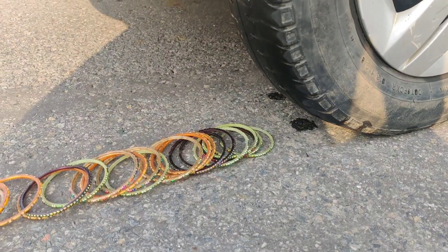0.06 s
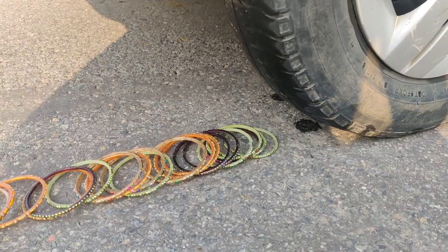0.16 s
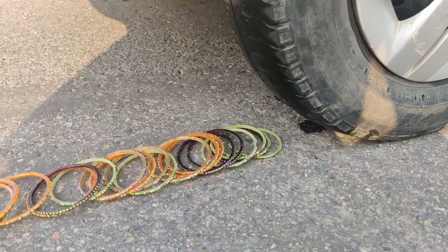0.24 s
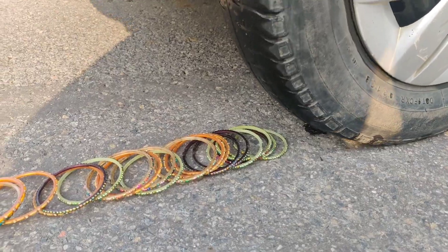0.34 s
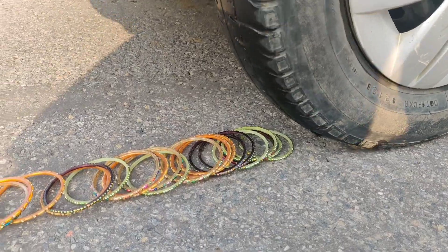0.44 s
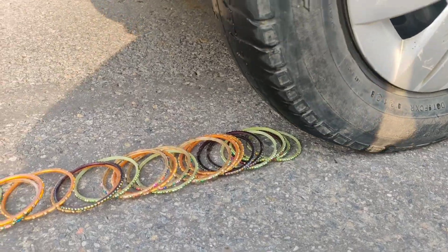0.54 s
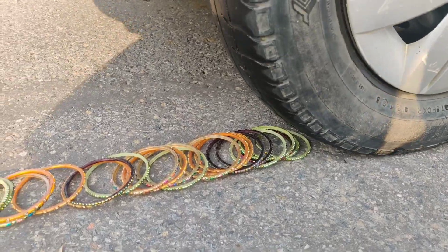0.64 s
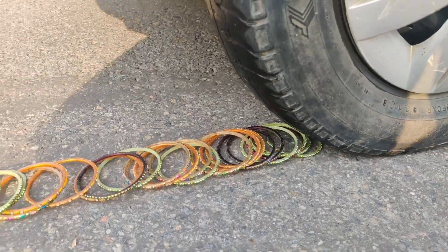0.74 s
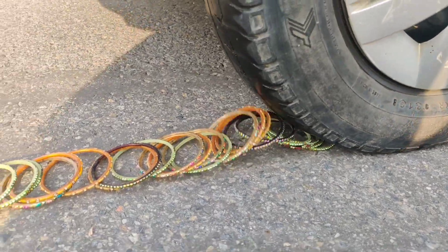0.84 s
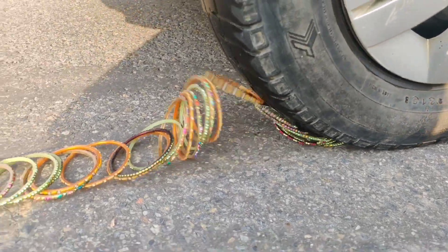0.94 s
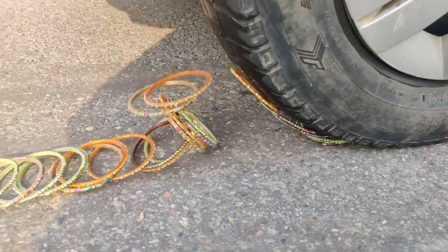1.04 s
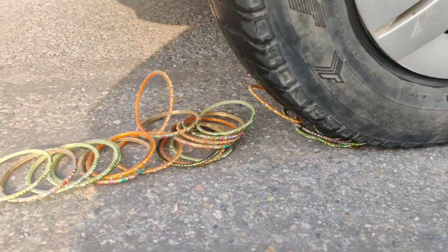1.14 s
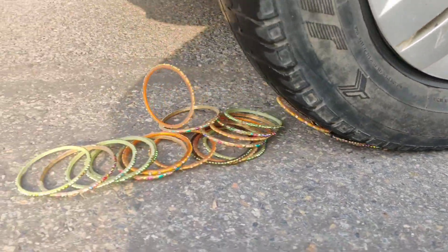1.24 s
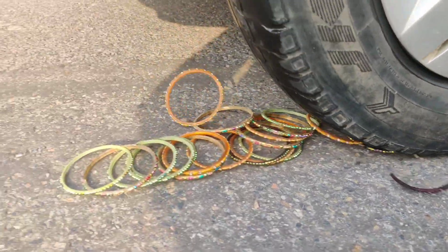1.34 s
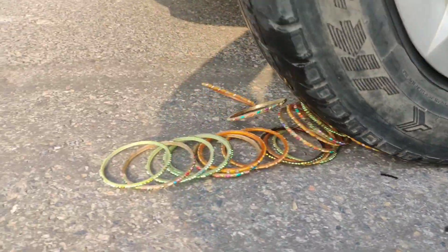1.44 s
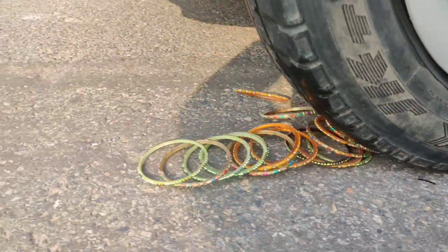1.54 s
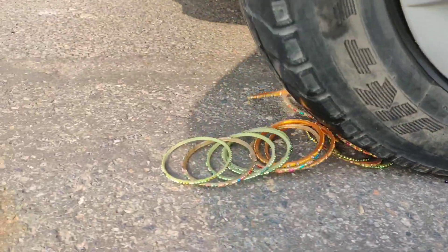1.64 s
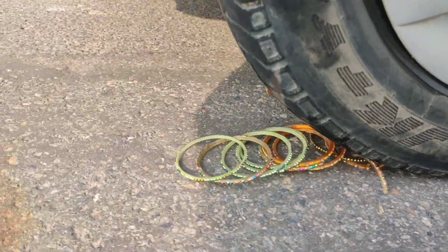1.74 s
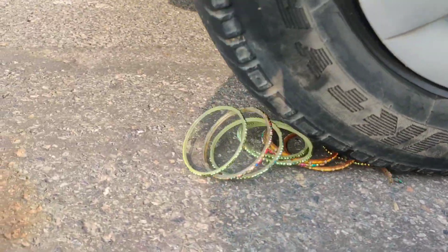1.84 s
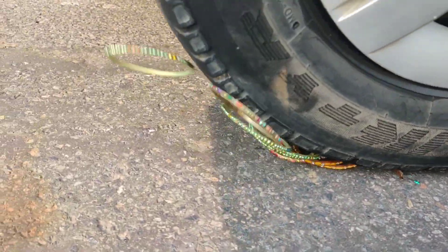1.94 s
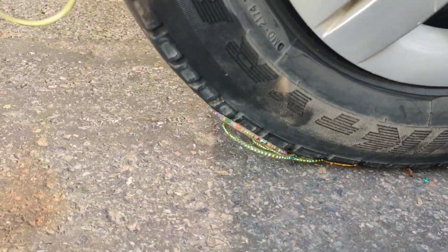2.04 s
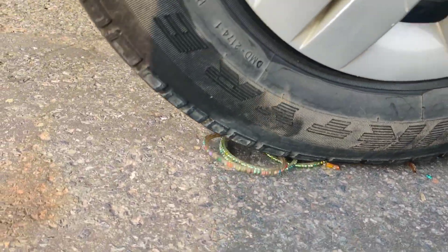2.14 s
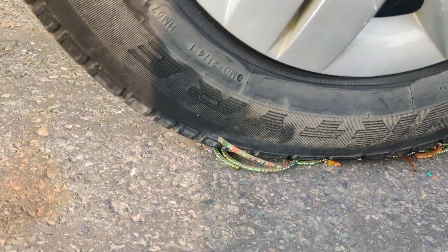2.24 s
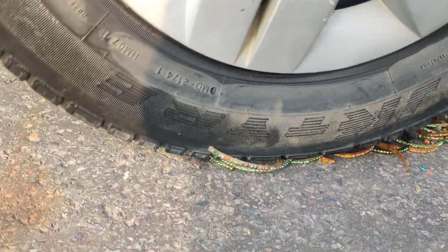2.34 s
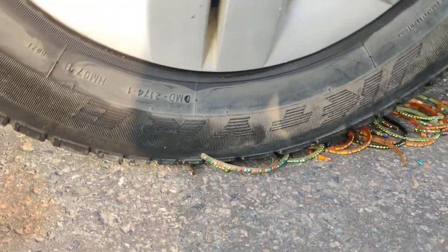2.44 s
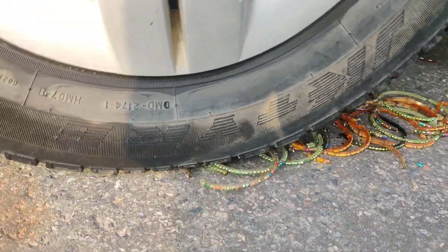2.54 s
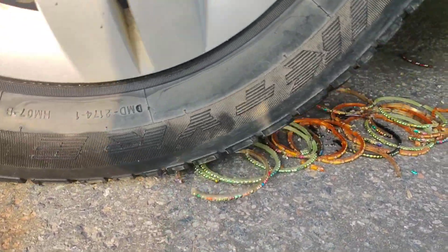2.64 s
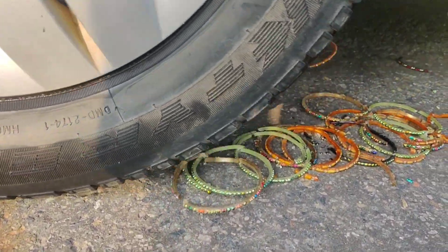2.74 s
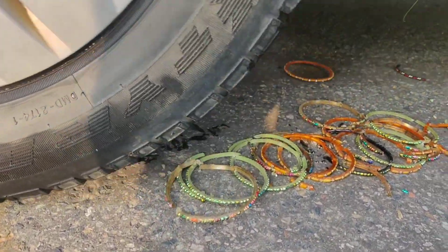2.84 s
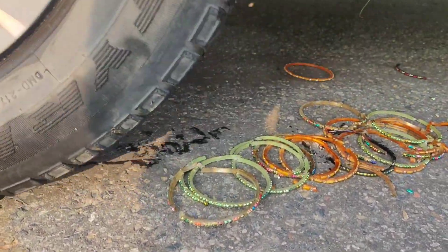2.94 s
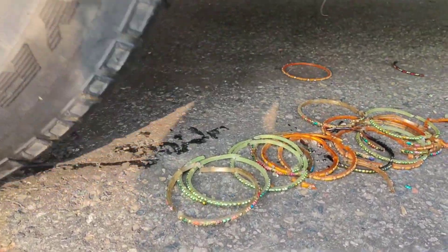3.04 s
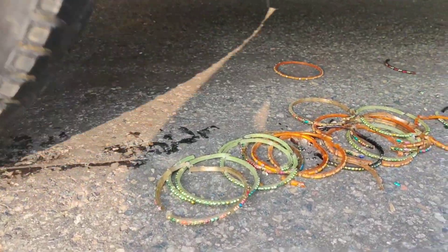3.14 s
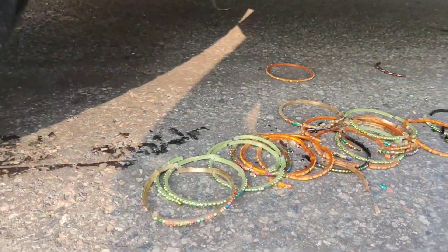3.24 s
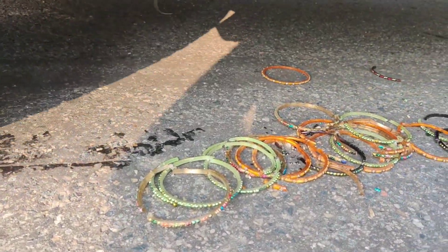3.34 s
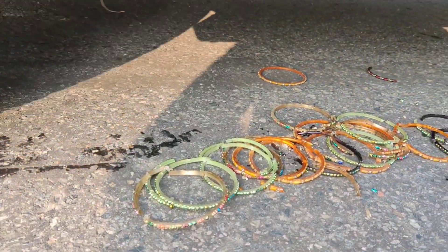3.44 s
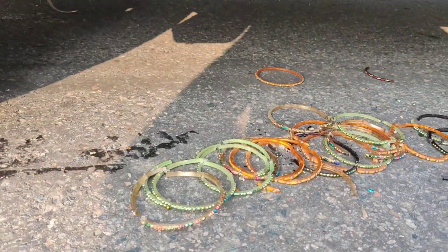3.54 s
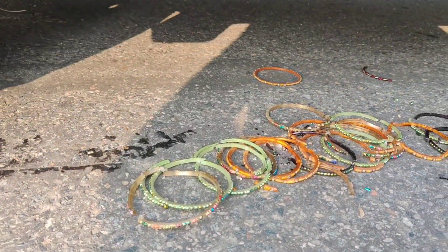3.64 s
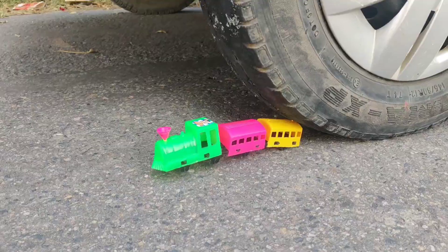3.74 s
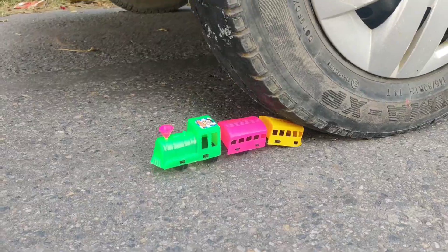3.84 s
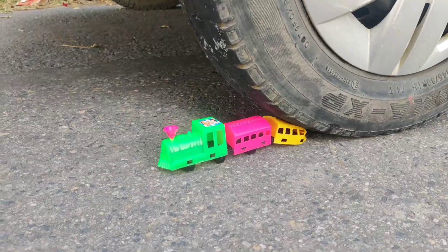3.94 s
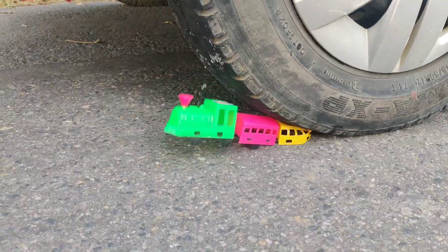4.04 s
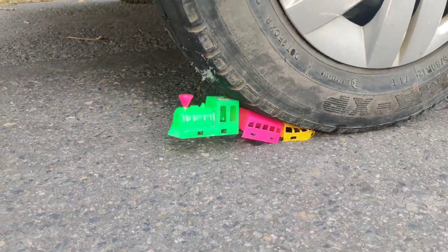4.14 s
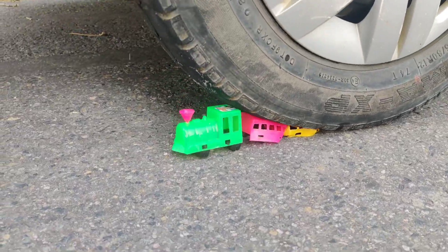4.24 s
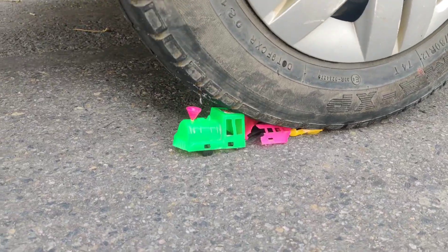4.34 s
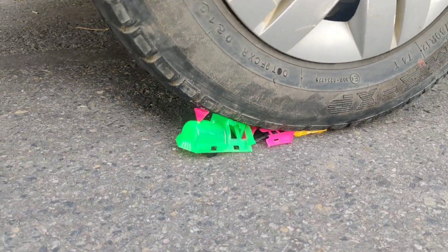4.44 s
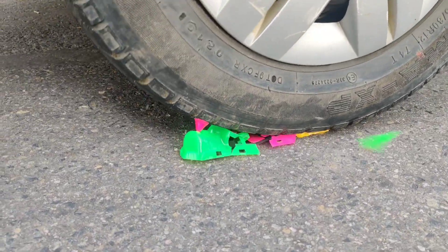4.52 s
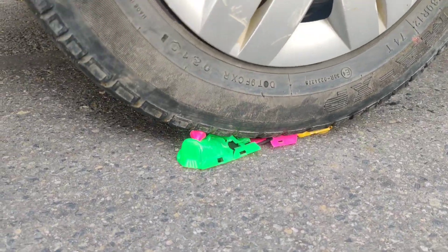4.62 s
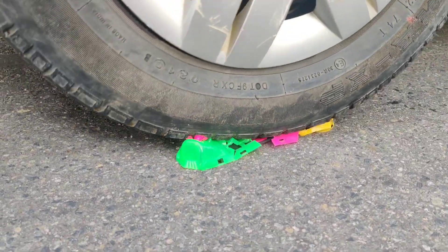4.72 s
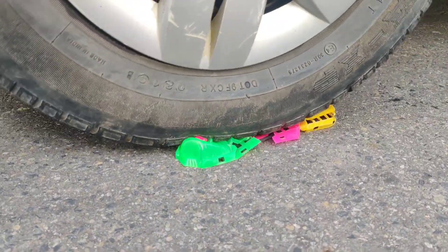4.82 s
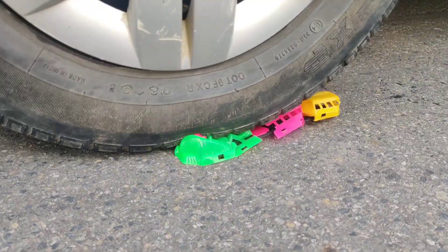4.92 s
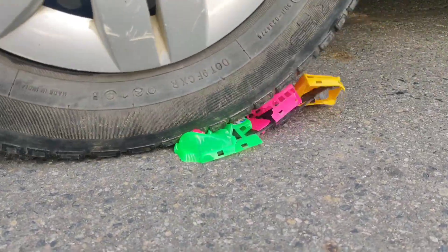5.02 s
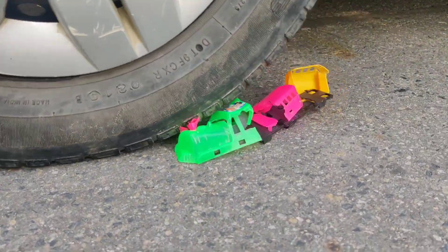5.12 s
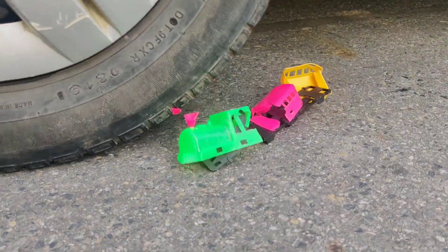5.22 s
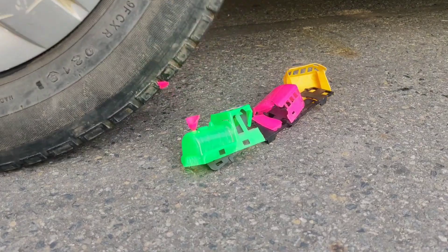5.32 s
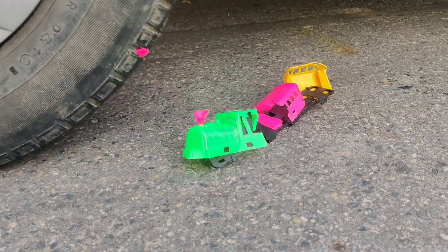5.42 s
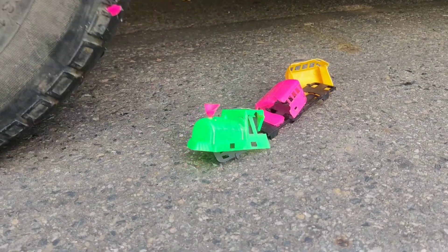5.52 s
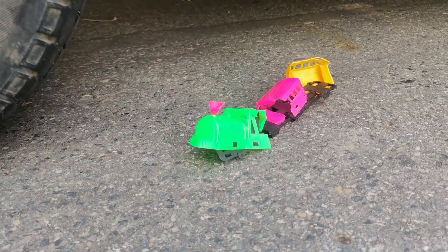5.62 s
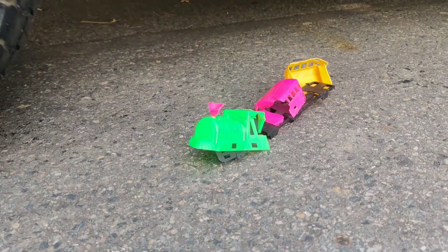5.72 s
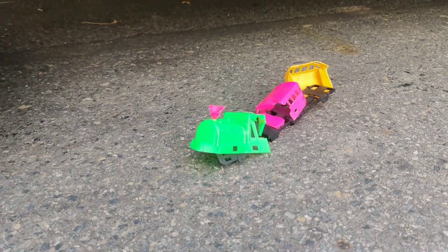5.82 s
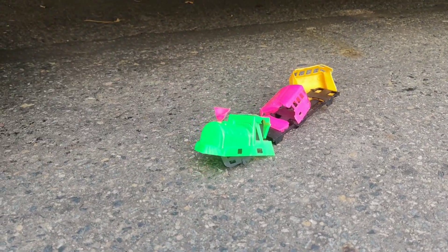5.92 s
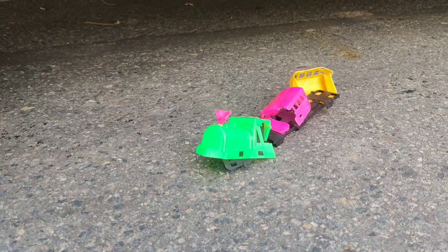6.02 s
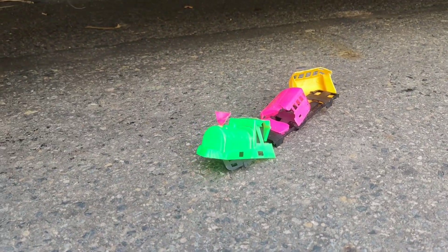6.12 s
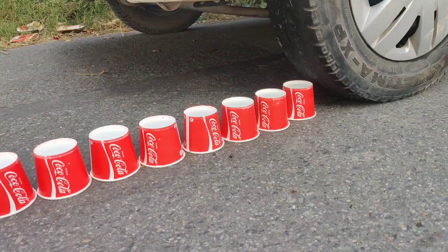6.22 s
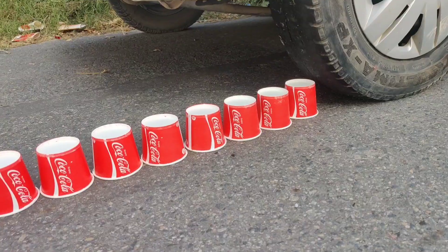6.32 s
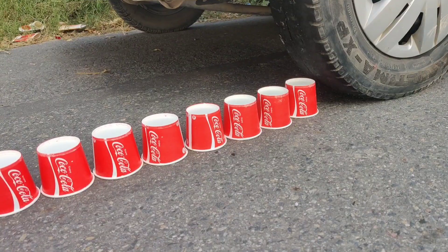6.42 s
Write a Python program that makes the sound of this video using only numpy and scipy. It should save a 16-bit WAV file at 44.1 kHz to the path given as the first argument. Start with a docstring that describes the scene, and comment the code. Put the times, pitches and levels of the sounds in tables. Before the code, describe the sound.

A slow car tyre snaps a row of brittle bangles that crackle and tinkle, then after a tiny silence crushes a hollow plastic toy train.

```python
"""On an asphalt road, close to a car's front tyre. The creeping tread snaps a row of brittle bangles, whose
loose hoops tinkle, and pops a few shards. The sound drops out for a moment; then the tread bursts a hollow
plastic toy train, which squeaks, with dull low thumps under some of its cracks. Cracks are bursts of noise sent
through resonances, and they echo in the wheel arch and the street. Ringing hoops and squeaks are sine tones;
crushing and scraping are grainy noise. Shaped noise and two wavering tones make the engine; a faint whistle
sounds near the end."""
import sys
import numpy as np
from scipy import signal
from scipy.fft import rfft, irfft
from scipy.io import wavfile
from scipy.ndimage import uniform_filter1d

SR = 44100
rng = np.random.default_rng(int(sys.argv[2]) if len(sys.argv) > 2 else 0)


def bounce(signal):
    """Save signal as a 16-bit WAV file at the path given by the first command-line argument."""
    frames = np.transpose(np.atleast_2d(signal))
    limited = np.clip(frames, -1, 1)
    pcm = np.round(limited * 32767).astype(np.int16)
    wavfile.write(sys.argv[1], SR, pcm)


N = 285315
TIME = np.arange(N) / SR

# Cracks, before each group's overall level is set, as (time [s], knock level [dB], body level [dB],
# snap level [dB], pitch of the piece [Hz], time the break takes [ms]).
# The bangles: one after another under the tread
BANGLE_CRACKS = [(0.8707, -41, -45, -40, 1090, 7.3), (0.8887, -47, -33.5, -30, 1200, 2.6),
                 (0.9013, -39.5, -24, -22, 1530, 1.3), (0.9723, -41, -28, -26, 1880, 3),
                 (1.0036, -28.5, -22.5, -23, 1150, 2.3), (1.0264, -40, -26.5, -32, 1420, 0.43),
                 (1.031, -33, -21.5, -21, 1820, 5.3), (1.061, -71, -24, -26, 1730, 1.1),
                 (1.0693, -28.5, -25, -24, 1950, 1.6), (1.1049, -37, -24.5, -30, 1280, 1.1),
                 (1.1402, -31.5, -26, -39, 1840, 4.2), (1.1504, -25.5, -18.5, -22, 1660, 0.27),
                 (1.1604, -75, -25.5, -24, 1670, 1.7), (1.1723, -36, -27, -25, 1430, 3.2),
                 (1.1949, -30, -19.5, -26.5, 1190, 0.84), (1.2292, -31.5, -20.5, -25, 1500, 3.3),
                 (1.2424, -32, -31, -25, 1700, 0.46), (1.2593, -37, -18, -25, 1250, 2.4),
                 (1.2781, -37, -21, -27, 1480, 4.2), (1.2873, -27, -17.5, -20, 1320, 1.2),
                 (1.303, -29, -21, -25.5, 1110, 1.2), (1.333, -27, -23, -22.5, 1310, 7.2),
                 (1.369, -33.5, -25.5, -29, 1430, 1.5), (1.3811, -34, -21, -23, 1370, 0.61),
                 (1.4054, -40, -36, -27, 1200, 0.39), (1.414, -24.5, -20.5, -28, 1430, 1.4),
                 (1.451, -28, -18.5, -25, 1180, 2.3), (1.5141, -42, -18, -32, 1240, 1.7),
                 (1.52, -37, -38, -24.5, 1400, 0.35), (1.5626, -39, -24.5, -21.5, 1150, 1.7),
                 (1.572, -34, -32, -32.5, 1420, 0.71), (1.5767, -31.5, -26.5, -22, 1420, 3.4),
                 (1.593, -30.5, -18.5, -20, 1320, 11), (1.6225, -25.5, -26.5, -21, 1420, 10),
                 (1.65, -36, -26, -22.5, 1440, 8.3), (1.6672, -32.5, -20.5, -21.5, 1900, 6.8),
                 (1.6802, -43.5, -17.5, -24, 970, 0.55), (1.6906, -34, -26, -22, 1110, 3.5),
                 (1.707, -28.5, -29.5, -23.5, 1340, 1.9), (1.7442, -26, -22, -23, 1150, 2.2),
                 (1.7498, -36, -22, -23, 1340, 2.4), (1.784, -26.5, -21.5, -25, 1020, 1.3),
                 (1.7906, -33, -23, -23.5, 1540, 1.2), (1.8083, -22.5, -22, -20.5, 1240, 0.53),
                 (1.8258, -39, -15.5, -22.5, 1330, 6.4), (1.8517, -30, -18, -24, 1290, 3.2),
                 (1.8864, -29.5, -24.5, -29, 1440, 1.9), (1.9163, -25, -23.5, -22, 1470, 4.5),
                 (1.9313, -27, -25, -24, 1450, 0.92), (1.9405, -31, -26, -29, 1310, 2.7),
                 (1.9687, -38, -25.5, -34, 1660, 1.8), (1.9872, -25.5, -31, -28, 1570, 3.9),
                 (2.01, -28, -22, -25.5, 1160, 0.73), (2.048, -49.5, -26, -24, 1300, 2.6),
                 (2.0644, -18, -31, -22.5, 1930, 0.62), (2.0717, -59, -24, -23.5, 1890, 0.93),
                 (2.098, -30, -21, -24.5, 1440, 1.3), (2.1165, -47, -30, -29, 1370, 1.2),
                 (2.1252, -30, -20.5, -23.5, 1220, 3.9), (2.1588, -39, -28, -44, 1520, 0.82),
                 (2.1736, -31, -21.5, -21.5, 960, 6), (2.1993, -28, -29, -24.5, 1360, 3.9),
                 (2.22, -37, -28.5, -28, 1430, 0.72), (2.2402, -40, -17.5, -22, 1470, 0.33),
                 (2.2496, -32.5, -19.5, -21, 1300, 1.7), (2.263, -29, -23, -23, 1330, 2.5),
                 (2.28, -33.5, -29, -19.5, 1580, 1.2), (2.303, -57, -42, -44, 1450, 0.98),
                 (2.318, -61, -48, -49, 1530, 0.9), (2.3305, -22.5, -22.5, -22, 1290, 1.3),
                 (2.3588, -52, -28.5, -28, 1610, 0.66), (2.3905, -30, -28, -29, 1740, 0.49),
                 (2.4139, -42, -36, -50, 2060, 6.1), (2.5006, -36, -20.5, -19.5, 1800, 0.16),
                 (2.6086, -43, -35.5, -25.5, 1840, 7.3)]
# The toy train: same columns
TRAIN_CRACKS = [(3.759, -51, -42.5, -45, 2000, 3.7), (3.8161, -45, -46, -45, 1430, 0.98),
                (3.8204, -47, -37, -56, 1430, 0.71), (3.8301, -37, -25, -19, 2950, 0.36),
                (3.8414, -35.5, -29.5, -50.5, 1980, 1.5), (3.9127, -43.5, -46.5, -38.5, 1640, 0.71),
                (3.9427, -29.5, -37.5, -55.5, 890, 0.97), (3.979, -26.5, -27, -28.5, 2610, 1.4),
                (3.986, -61, -21.5, -22, 2280, 1.8), (3.9987, -41, -21.5, -24, 3000, 0.29),
                (4.017, -60.5, -28.5, -24, 3070, 0.37), (4.0653, -62, -53, -48.5, 2610, 0.4),
                (4.074, -50, -40.5, -28, 2420, 0.31), (4.1091, -54, -47, -41, 1400, 5.1),
                (4.183, -44, -29, -54.5, 1950, 0.94), (4.1928, -26, -19, -12, 2310, 1.6),
                (4.2646, -28.5, -25, -21.5, 3200, 6.4), (4.2707, -27.5, -23.5, -20, 2400, 1.9),
                (4.2824, -25, -23, -54, 1860, 0.52), (4.3178, -38.5, -40, -36, 2740, 0.32),
                (4.3634, -26.5, -21.5, -17, 2670, 0.45), (4.368, -33, -34.5, -20, 2450, 1.7),
                (4.378, -40, -19.5, -17, 2470, 1.7), (4.3938, -28.5, -57.5, -30.5, 2030, 0.33),
                (4.405, -56, -33, -24, 1700, 2.7), (4.4196, -28, -23, -29, 2060, 1.6),
                (4.4365, -24, -24, -18.5, 2320, 2.4), (4.481, -31, -22.5, -31.5, 1970, 2.7),
                (4.5224, -23.5, -21.5, -14.5, 2430, 2.8), (4.5574, -24.5, -24.5, -15, 1980, 3.4),
                (4.6045, -23.5, -26, -23, 1970, 1.9), (4.6221, -47, -25, -14.5, 1580, 1.5),
                (4.6327, -25.5, -59, -38.5, 1370, 0.85), (4.707, -41, -39, -28, 2620, 14),
                (4.7144, -32.5, -22, -18.5, 1730, 2.5), (4.7371, -34.5, -19.5, -42, 2220, 0.24),
                (4.7529, -26.5, -17.5, -16.5, 1960, 1), (4.846, -20.5, -18, -17, 2000, 1.2),
                (4.8905, -65.5, -59, -29.5, 3090, 0.21), (4.8976, -58, -47, -39, 2350, 2.4),
                (4.9159, -62, -47, -31.5, 2900, 0.33), (4.941, -53.5, -32.5, -31, 2090, 2),
                (4.9526, -43.5, -21.5, -20.5, 1620, 0.32), (5.0266, -38.5, -48, -29.5, 1890, 1.1),
                (5.0382, -79.5, -55.5, -32.5, 2860, 3.1), (5.0496, -43, -33, -29, 1970, 6.5),
                (5.078, -64, -38, -40, 1750, 1.4), (5.102, -36.5, -24.5, -27, 2380, 4.4),
                (5.111, -40.5, -51.5, -24.5, 2220, 0.78), (5.1214, -59, -37, -45, 1860, 0.34),
                (5.1283, -47.5, -16.5, -18.5, 2430, 0.91), (5.169, -68, -24, -29.5, 2330, 1.1),
                (5.1855, -63.5, -35.5, -33, 2730, 0.7), (5.2038, -49, -41, -39.5, 2600, 14),
                (5.2812, -58, -41.5, -46, 1930, 0.68), (5.3102, -49, -50, -43.5, 2740, 3.2),
                (5.385, -66, -73, -43.5, 2680, 1.1), (5.4162, -58, -48.5, -42.5, 2800, 1.8),
                (5.6637, -61, -60, -37.5, 2160, 0.84), (5.7147, -48, -39, -30.5, 3460, 5.2),
                (5.7707, -57, -57, -31.5, 3580, 11)]
# Fine crushing under the tread, in three stretches of rows, before the overall levels are set:
# (time [s], crunch level [dB], splinter level [dB])
CRUSH = [
    [(0.0, -59, -55.5), (0.3, -58.5, -60.5), (0.45, -56, -51.5), (0.84, -57.5, -59.5), (0.92, -43, -34.5),
     (0.99, -43, -41), (1.06, -45.5, -31.5), (1.13, -34, -37), (1.21, -40, -27), (1.31, -39.5, -39),
     (1.6, -47.5, -47), (1.76, -43, -30.5), (1.97, -33.5, -24), (2.11, -38.5, -40), (2.2, -36.5, -33),
     (2.3, -46.5, -78), (2.42, -46.5, -30.5), (2.53, -56, -45), (2.73, -50, -44), (2.91, -52, -44.5),
     (3.52, -52.5, -44), (3.65, -53.5, -45)],
    [(3.71, -58, -50), (3.85, -57, -59), (4.05, -58.5, -51.5), (4.22, -43.5, -43), (4.42, -59, -57),
     (4.56, -30, -29), (4.69, -58, -39), (4.82, -52, -46.5), (5.0, -46, -39), (5.07, -39.5, -32),
     (5.13, -50.5, -51.5), (5.25, -55.5, -47.5), (5.35, -57.5, -51.5), (5.6, -57.5, -51.5),
     (5.8, -52.5, -43), (6.03, -56.5, -52), (6.16, -57.5, -52), (6.2, -58, -56)],
    [(6.215, -67, -66), (6.323, -66.5, -65), (6.47, -67, -64)],
]


def from_db(db):
    """Turn decibels into a plain multiplier."""
    return 10 ** (np.asarray(db) / 20)


def rms_one(x):
    """Scale a sound to an average strength (RMS) of 1."""
    return x / np.sqrt(np.mean(x ** 2) + 1e-20)


def level(rows, column=1):
    """Multiplier over time, drawn as a line through one dB column of a table."""
    rows = np.array(rows)
    return from_db(np.interp(TIME, rows[:, 0], rows[:, column]))


def add(out, s, sound):
    """Mix a short sound in at time s."""
    at = max(round(s * SR), 0)
    out[..., at:at + sound.shape[-1]] += sound[..., :N - at]


def cut(x, hz, kind, order=2):
    """Keep only what lies below ("low") or above ("high") a frequency, with a Butterworth filter."""
    return signal.lfilter(*signal.butter(order, min(hz, SR * .45), kind, fs=SR), x)


def resonate(x, hz, width_hz):
    """One resonance, like a piece that prefers one pitch; about gain 1 at its peak."""
    r = np.exp(-np.pi * width_hz / SR)
    feed = np.array([1, 0, -1]) * (1 - r * r) / 2
    feedback = [1, -2 * r * np.cos(2 * np.pi * hz / SR), r * r]
    return signal.lfilter(feed, feedback, x)


def colour(x, points, size=4096):
    """Give a sound the spectrum in a table; minimum phase, so nothing is heard ahead of time."""
    hz, db = np.transpose(points)
    grid = np.maximum(np.arange(size // 2 + 1) * SR / size, 1)
    cepstrum = irfft(np.log(from_db(np.interp(np.log(grid), np.log(hz), db))))
    # folding the second half onto the first makes the filter minimum phase
    cepstrum[1:size // 2] *= 2
    cepstrum[size // 2 + 1:] = 0
    response = irfft(np.exp(rfft(cepstrum)))
    return signal.oaconvolve(np.atleast_2d(x), response[None], axes=1)[:, :N]


def spread(three, apart):
    """Stereo from one shared signal and one for each side."""
    return three[0] + apart * three[1:]


def drift(rate):
    """Random wandering around 0 with a spread near 1: straight lines between `rate` points a second."""
    knots = np.arange(0, N / SR + 1, 1 / rate)
    return np.interp(TIME, knots, rng.standard_normal(len(knots)))


def grains(per_s, size_db, hiss):
    """Countless tiny fractures of uneven size over a smooth hiss."""
    born = rng.random(N) < per_s / SR
    sizes = from_db(size_db * np.minimum(rng.exponential(1, N), 4))
    fractures = rms_one(born * sizes * rng.standard_normal((3, N)))
    return fractures + hiss * rng.standard_normal((3, N))


def cracks(table, shell, shell_db, top_hz, piece_width, tear_db, knock_hz, knock_ms, apart, treble_apart,
           gains_db, size=2048):
    """A crack is one sharp release and a dying run of tiny tears; it knocks on the tread, rings the piece and snaps."""
    out, t = np.zeros((2, N)), np.arange(size) / SR
    # table levels count as if each crack's energy were packed into 5 ms
    five_ms = np.sqrt(.005 * SR / size)
    for s, knock_db, body_db, snap_db, hz, ms in table:
        run = t / (max(ms, .2) / 1000)
        fade = np.exp(-run ** 0.84) + 0.049 * np.exp(-t / 0.0076)
        uneven = from_db(tear_db + 3.45 * rng.standard_normal(size))
        tears = rng.standard_normal((3, size)) * uneven * fade
        tears[0, 8] += rng.choice([-1, 1])   # the sharp release, pushing or pulling
        # the two sides hear more alike in the lows than in the highs
        force, sharp = spread(tears, apart), spread(tears, treble_apart)

        # each piece has its own few short-lived notes, and shares those of its surroundings
        pitches = hz * np.array([.58, 1, 1.4, 2.1]) * from_db(rng.normal(0, .6, 4))
        strengths = (0.5, -1.057, 0.6, -0.23)
        piece = sum(g * resonate(force, f, piece_width * f) for f, g in zip(pitches, strengths))
        shared = sum(resonate(force, f, w) * from_db(db) * rng.normal(1, 0.47) for f, w, db in shell)
        body = rms_one(rms_one(piece) + from_db(shell_db) * rms_one(shared))

        push = force + 0.081 * rng.standard_normal(size) * np.exp(-t / (knock_ms / 1000))
        knock = cut(cut(push, knock_hz, "low", order=3), 250, "high", order=1)
        snap = cut(cut(sharp, 4300, "high"), top_hz, "low", order=1)
        levels_db = np.array([knock_db, body_db, snap_db]) + gains_db
        sound = five_ms * sum(from_db(db) * rms_one(part) for part, db in zip((knock, body, snap), levels_db))

        # pieces lie at slightly different angles
        pan_db, lag_s = rng.normal(0, 1.0), rng.normal(0, .00004)
        add(out[0], s + lag_s, sound[0] * from_db(pan_db))
        add(out[1], s, sound[1] * from_db(-pan_db))
    return out


def crumbs(span_s, pitch_hz, knock_db, body_db, snap_db, count):
    """Broken pieces break again: small cracks at random times, with levels following the crushing of the moment."""
    rows = np.vstack(CRUSH)
    s = rng.uniform(*span_s, count)
    hz = pitch_hz * rng.uniform(.7, 1.4, count)
    db = np.interp(s, rows[:, 0], rows[:, 1]) + rng.normal(0, 3, count)
    snaps_db = db + snap_db + rng.normal(0, 3.2, count)
    ms = rng.uniform(0.23, 1.6, count)
    return np.column_stack([s, db + knock_db, db + body_db, snaps_db, hz, ms])


def shard_rings(ring_db, t60, count=3, size=4096):
    """Every broken bangle leaves arcs that chime briefly at pitches of their own, fading 60 dB in t60 seconds."""
    out, t = np.zeros((2, N)), np.arange(size) / SR
    for s, _, _, snap_db, _, _ in BANGLE_CRACKS:
        hz = rng.uniform(7300, 15500, (count, 1))
        chimes = np.sin(2 * np.pi * hz * t) * from_db(-60 * t / t60)
        add(out, s, from_db(snap_db + ring_db) * rng.standard_normal((2, count)) @ chimes)
    return out


def hoops(tick_db, wobble_db, size=32768):
    """Whole hoops clink together and ring on, each mode (way of bending) fluttering as they rock on the road."""
    # loose hoops touching: (time [s], level [dB], size name)
    touches = [(2.400, -37, "medium"), (2.413, -48, "large"), (2.610, -46, "tiny"),
               (2.614, -42.5, "narrow"), (2.705, -51, "tiny"), (2.729, -40, "medium"),
               (2.745, -46.5, "large"), (2.759, -32, "medium"), (2.823, -46, "medium"),
               (2.826, -59, "small"), (2.845, -78, "wide"), (2.867, -44, "medium"),
               (2.906, -31.5, "medium"), (2.960, -37.5, "narrow"), (3.032, -46.5, "large")]
    # modes of every hoop: (relative level [dB], time to fade by 60 dB [s])
    hoop_modes = [(-23, 0.98), (-14.5, 0.74), (3, 0.22), (2, 0.11)]
    # main pitch for each size name [Hz]
    size_hz = {"wide": 6010, "large": 6842, "medium": 7666, "narrow": 8218, "small": 8750, "tiny": 9430}
    # pitch of each mode: (multiple of the main pitch)
    multiples = [.182, .522, 1, 1.613]
    out, t = np.zeros((2, N)), np.arange(size) / SR
    db, t60 = np.transpose(hoop_modes)[:, :, None]
    for s, touch_db, hoop in touches:
        hz = size_hz[hoop] * np.array(multiples)[:, None] * rng.normal(1, .0015, db.shape)
        rocking = np.sin(2 * np.pi * (rng.uniform(28, 41.0, db.shape) * t + rng.random(db.shape)))
        turn = 2 * np.pi * (hz * t + rng.random((2, len(hoop_modes), 1)) / 2)
        fade_db = db - 60 * t / t60 + wobble_db * rocking + rng.normal(0, 2.2, db.shape)
        ring = (np.sin(turn) * from_db(fade_db)).sum(axis=1)
        onset = 1 - np.exp(-t / 0.00033)
        tick = from_db(tick_db) * cut(rng.standard_normal((2, size)), 5000, "high") * np.exp(-t / .002)
        add(out, s, from_db(touch_db) * (ring * onset + tick))
    return out


def thumps(step_db, settle_s, edge_hz):
    """Dull low thumps at the cracks in the middle of the train's crushing: random steps that settle back."""
    # the train caves in: (start [s], end [s])
    caving = (4.43, 4.95)
    steps = np.zeros((2, N))
    for s, knock_db, *_ in TRAIN_CRACKS:
        if caving[0] < s < caving[1]:
            add(steps, s, from_db(knock_db + step_db) * rng.choice([-1, 1]) * rng.uniform(0, 3, (2, 1)))
    kept = np.exp(-1 / (settle_s * SR))   # share of a step left after one sample
    settling = signal.lfilter([1], [1, -kept], steps + 1e-18)
    return cut(settling, edge_hz, "low", order=1)


def squeaks():
    """The bending shell sticks and slips in thin, unsteady tones."""
    # bent plastic squeaking: (time [s], length [s], pitch [Hz], level [dB])
    squeak_rows = [(4.083, 0.16, 1200, -48), (4.134, 0.088, 1800, -48), (4.27, 0.13, 2000, -54),
                   (5.147, 0.052, 2310, -42.5), (5.15, 0.065, 3010, -45)]
    out = np.zeros(N)
    for s, length, hz, db in squeak_rows:
        swell = np.sin(np.pi * np.clip((TIME - s) / length, 0, 1))
        unsteady_hz = hz * (1 + 0.0032 * drift(170))
        out += from_db(db) * swell * np.sin(2 * np.pi * np.cumsum(unsteady_hz) / SR)
    return out


def scrapes(width):
    """Sliding edges catch on the grain of the road in a fine, bright rasp."""
    # pieces sliding on the asphalt: (time [s], length [s], centre [Hz], level [dB])
    strokes = [(0.442, 0.056, 5430, -52.5), (0.778, 0.049, 8250, -56), (0.92, 0.091, 10100, -37.5),
               (3.318, 0.049, 7500, -51), (3.414, 0.039, 7900, -50), (3.24, .035, 2600, -41.5),
               (5.048, 0.027, 5000, -55), (5.165, 0.071, 2640, -53), (5.587, 0.033, 10600, -48),
               (5.708, 0.025, 4100, -39.5), (5.734, 0.057, 8200, -40.5)]
    out = np.zeros((2, N))
    rasp = spread(grains(2500, 2.1, hiss=0.95), apart=1.1)
    for s, length, hz, db in strokes:
        at, count = round(s * SR), round(length * SR)
        stroke = resonate(rasp[:, at:at + count], hz, width * hz) * np.sqrt(np.hanning(count))
        add(out, s, from_db(db) * rms_one(stroke))
    return out


def crushing(crunch_db, splinter_db):
    """Crumbs and grit are ground between rubber and asphalt."""
    # spectrum of the coarse crunch: (frequency [Hz], level [dB per Hz])
    crunch_spectrum = [(150, -15.5), (330, -2.5), (800, -1), (1500, -1), (2500, -0.5), (4000, -14),
                       (8000, -25.5)]
    # spectrum of the bright splinters: (frequency [Hz], level [dB per Hz])
    splinter_spectrum = [(1500, -41.5), (3500, 3.5), (6000, -1.5), (10000, 0), (16000, -5.5)]
    rows = np.vstack(CRUSH)
    crunch = rms_one(colour(spread(grains(1700, 2.7, hiss=0.89), apart=1.0), crunch_spectrum))
    splinters = rms_one(colour(spread(grains(1800, 3.5, hiss=0.91), apart=5.5), splinter_spectrum))
    crunch = from_db(crunch_db) * level(rows, column=1) * crunch
    return crunch + from_db(splinter_db) * level(rows, column=2) * splinters


def echoes(x, wet_db, t60, low_hz, top_hz, size=16384):
    """Dense scattered reflections, different on each side, fading 60 dB in t60 seconds."""
    t = np.arange(size) / SR
    tail = rng.standard_normal((2, size)) * from_db(-60 * t / t60) * (1 - np.exp(-t / 0.00053))
    tail = tail / np.sqrt(np.sum(tail ** 2) / 2)
    tail = cut(cut(tail, low_hz, "high"), top_hz, "low", order=1)
    return from_db(wet_db) * signal.oaconvolve(x, tail, axes=1)[:, :N]


def engine(rumble_db, hum_hz, upper_hz, upper_db):
    """Engine and rolling tyre: a low, lumpy rumble of shaped noise with a wavering two-tone hum."""
    # rumble before its overall level is set: (time [s], level [dB])
    rumble_level = [(0, -37), (0.25, -36.5), (0.5, -36.5), (0.7, -39.5), (0.86, -38), (0.95, -48),
                    (1.3, -45), (1.53, -49), (1.7, -45), (2.3, -45), (2.56, -52), (2.63, -40), (2.9, -40),
                    (3.1, -39.5), (3.15, -46), (3.3, -40), (3.5, -35), (3.64, -39), (3.75, -39),
                    (3.88, -46), (3.96, -38), (4.06, -50), (4.14, -42), (4.25, -47), (4.36, -48),
                    (4.45, -41), (4.6, -37), (4.75, -40), (4.86, -48), (5.05, -45), (5.18, -51), (5.3, -40),
                    (5.6, -38), (5.8, -37), (6.0, -38.5), (6.19, -38), (6.23, -48), (6.47, -48)]
    # spectrum of the rumble: (frequency [Hz], level [dB per Hz])
    rumble_spectrum = [(15, -32), (25, -0.5), (32, -3.5), (102, -9.5), (130, -15), (238, -23), (303, -31.5),
                       (339, -28), (399, -34.5), (461, -34), (1200, -51.5), (1560, -85.5), (2640, -120)]
    # engine hum: (time [s], level [dB])
    hum_level = [(0, -50), (0.85, -65), (1.0, -82), (2.5, -86), (2.8, -54), (3.6, -47.5), (4.9, -57.5),
                 (5.5, -45), (6.18, -42), (6.23, -54.5), (6.47, -70)]
    rumble = rms_one(colour(spread(rng.standard_normal((3, N)), apart=0.38), rumble_spectrum))
    turn = 2 * np.pi * np.cumsum(1 + 0.03575 * drift(9.3)) / SR   # both tones waver together
    hum = np.sqrt(2) * (np.sin(hum_hz * turn) + from_db(upper_db) * np.sin(upper_hz * turn))
    return from_db(rumble_db) * level(rumble_level) * rumble + level(hum_level) * hum


def whistle():
    """One soft tone rises and falls far away."""
    # the faint whistle: (time [s], pitch [Hz], level [dB])
    glide = [(6.26, 630, -89.5), (6.3, 690, -68), (6.34, 822, -64), (6.38, 855, -66), (6.42, 780, -64),
             (6.46, 737, -97)]
    s, hz, _ = np.transpose(glide)
    tone = np.sin(2 * np.pi * np.cumsum(np.interp(TIME, s, hz)) / SR)
    return level(glide, column=2) * (TIME > s[0]) * tone


def scene():
    """Cracks echo between wheel arch and road, and faintly along the street; the other sounds join them."""
    # popping shards and grit: (time [s], knock level [dB], body level [dB], snap level [dB],
    # pitch of the piece [Hz], time the break takes [ms])
    grit_pops = [(0.2956, -37.5, -37, -39.5, 1040, 10), (3.031, -34, -36.5, -54, 1120, 8.2),
                 (3.0426, -37, -35.5, -42, 1050, 8), (3.0682, -43, -42, -39, 1570, 3.4),
                 (3.1137, -32.5, -23, -21, 1550, 1.04), (3.2279, -26, -20.5, -19.5, 1270, 5.4),
                 (3.2637, -48, -33, -27.5, 1980, 5.7), (3.296, -42, -36, -28.5, 1760, 2.4),
                 (3.4834, -34.5, -40, -27.5, 2130, 0.44), (3.5722, -50, -44, -44.5, 1650, 5.4),
                 (5.8137, -38, -45, -52, 1110, 2), (5.8507, -48, -44.5, -36.5, 1450, 5.5)]
    # resonances between tyre and road: (frequency [Hz], width [Hz], relative level [dB])
    tyre_wedge = [(339, 33, -7), (560, 60, -9), (845, 39, -1), (1040, 69, -2), (1390, 120, 0),
                  (1770, 93, -2)]
    # resonances of the hollow train: (frequency [Hz], width [Hz], relative level [dB])
    train_shell = [(373, 27, -7.5), (563, 27, -1), (1050, 330, -2.5), (1880, 420, -14), (2950, 500, -2)]
    bangle_crumbs = crumbs((1.0, 2.3), pitch_hz=1430, knock_db=-6, body_db=2, snap_db=4.5, count=42)
    train_crumbs = crumbs((4.55, 5.15), pitch_hz=2000, knock_db=-4.5, body_db=1, snap_db=5.5, count=12)
    # piece_width is a share of the pitch; gains_db are for knock, body and snap
    bangles = cracks(np.vstack([BANGLE_CRACKS, bangle_crumbs]), tyre_wedge, shell_db=-4.5, top_hz=19200,
                     piece_width=0.34, tear_db=-15, knock_hz=880, knock_ms=9,
                     apart=0.61, treble_apart=1.77, gains_db=(-.5, .5, 0))
    grit = cracks(grit_pops, tyre_wedge, shell_db=-6, top_hz=15200,
                  piece_width=0.44, tear_db=-10.5, knock_hz=820, knock_ms=30,
                  apart=1.0, treble_apart=2.9, gains_db=(-.5, .5, 0))
    train = cracks(np.vstack([TRAIN_CRACKS, train_crumbs]), train_shell, shell_db=-9, top_hz=6960,
                   piece_width=0.47, tear_db=-8.5, knock_hz=920, knock_ms=11.0,
                   apart=0.61, treble_apart=1.54, gains_db=(-.5, .3, 0))
    ringing = shard_rings(ring_db=-15.0, t60=0.11) + hoops(tick_db=1, wobble_db=5.5)
    hits = bangles + grit + train + ringing + scrapes(width=0.79)
    wheel_arch = echoes(hits, wet_db=-7.0, t60=0.035, low_hz=245, top_hz=11780)
    street = echoes(hits, wet_db=-19.5, t60=0.27, low_hz=298, top_hz=11000)
    low_thumps = thumps(step_db=2, settle_s=.07, edge_hz=180)
    ground = crushing(crunch_db=-3.0, splinter_db=-7)
    car = engine(rumble_db=1.0, hum_hz=104.2, upper_hz=174.7, upper_db=-9.5)
    return hits + wheel_arch + street + ground + squeaks() + low_thumps + car + whistle()


def record(dry):
    """Each microphone port colours the treble its own way; the sound drops out briefly; peaks are rounded."""
    # colouring of the left port: (frequency [Hz], level [dB])
    left_port = [(100, -2), (400, -2), (1500, 1), (3000, 0), (4500, 1), (5500, 5.5), (6300, 12),
                 (7200, 2.5), (8200, -1.5), (10000, -7), (15000, -2.5)]
    # colouring of the right port: (frequency [Hz], level [dB])
    right_port = [(100, -2), (400, -3.23), (1500, -0.96), (3000, -0.5), (4500, -3), (6300, 0), (8000, 0.5),
                  (9500, 9), (12000, 0.5), (15000, 2.5)]
    # silence ahead of the train: (start [s], end [s])
    silence = (3.659, 3.706)
    heard = np.vstack([colour(dry[0], left_port), colour(dry[1], right_port)])
    sounding = (TIME < silence[0]) | (TIME > silence[1])
    running = uniform_filter1d(1.0 * sounding, size=128)   # softens the edges of the silence
    rounded = np.tanh(heard * running)
    # almost nothing is left above 16900 Hz
    return signal.sosfilt(signal.cheby2(18, 60, 16900, fs=SR, output="sos"), rounded)


dry = scene()
out = record(dry)
bounce(out)
```